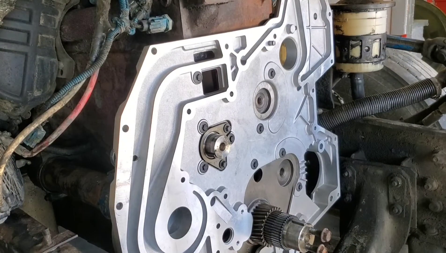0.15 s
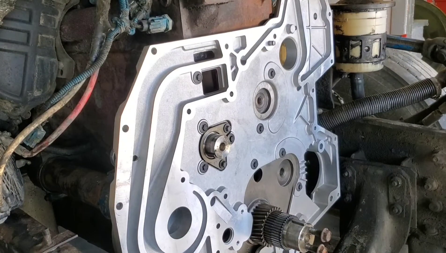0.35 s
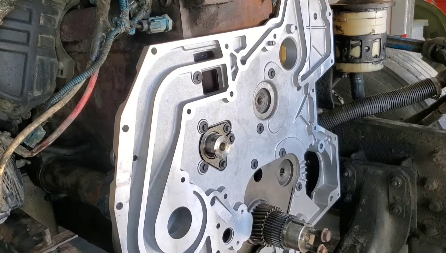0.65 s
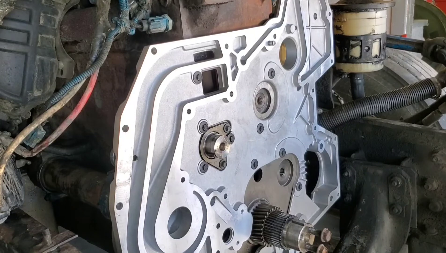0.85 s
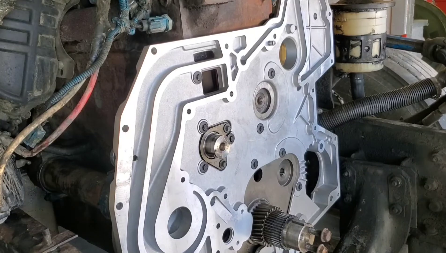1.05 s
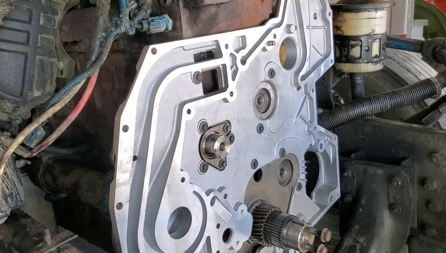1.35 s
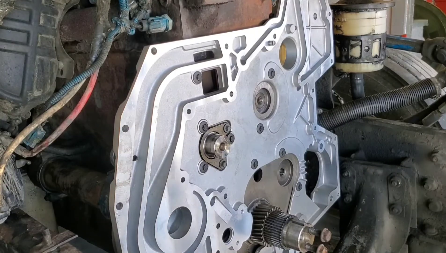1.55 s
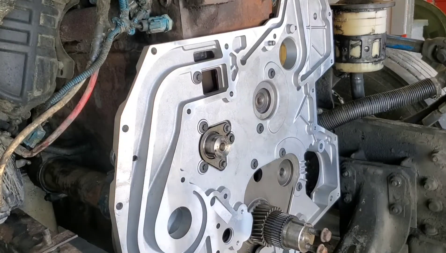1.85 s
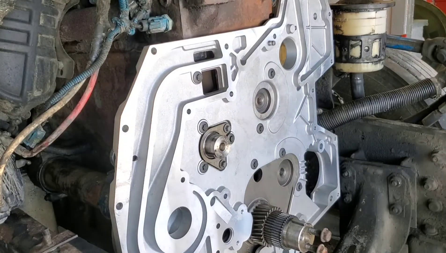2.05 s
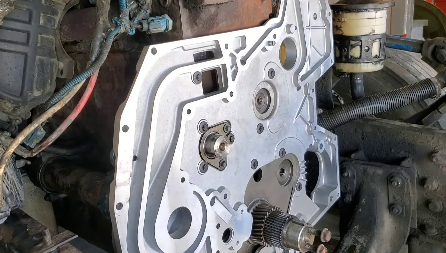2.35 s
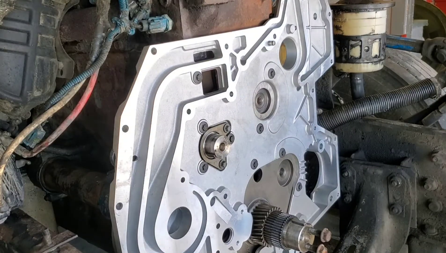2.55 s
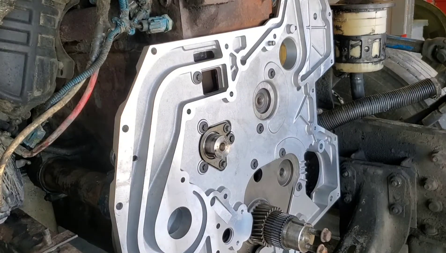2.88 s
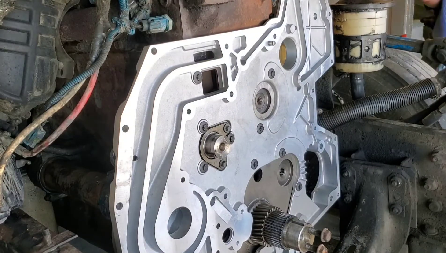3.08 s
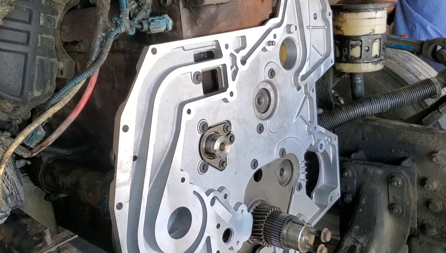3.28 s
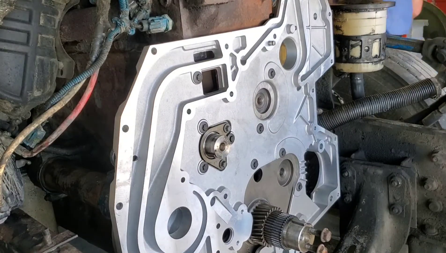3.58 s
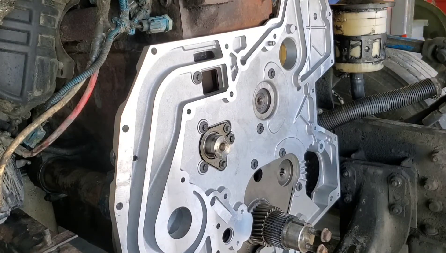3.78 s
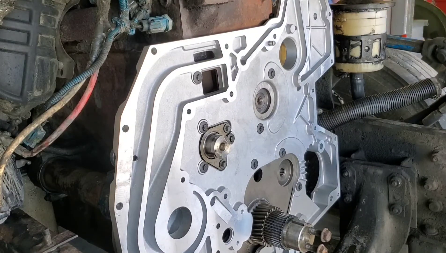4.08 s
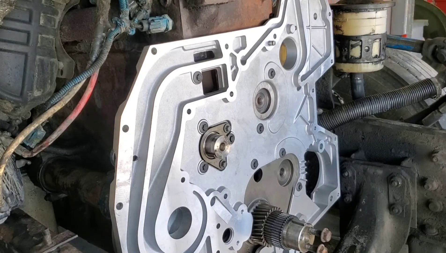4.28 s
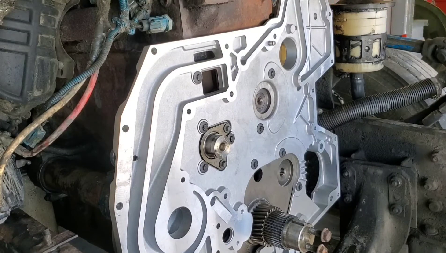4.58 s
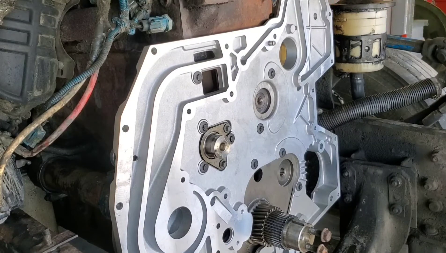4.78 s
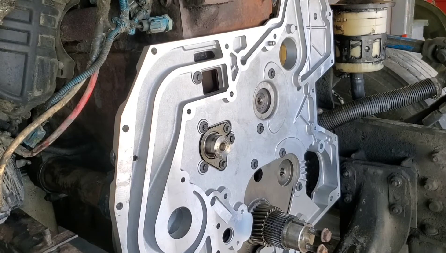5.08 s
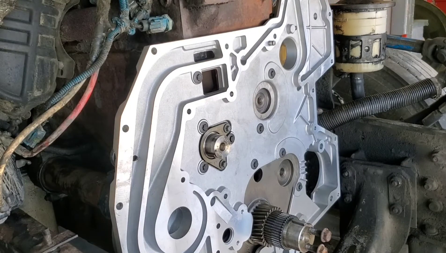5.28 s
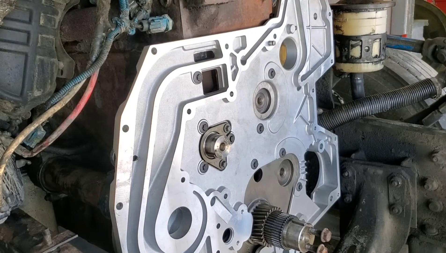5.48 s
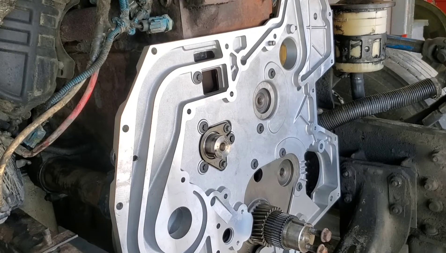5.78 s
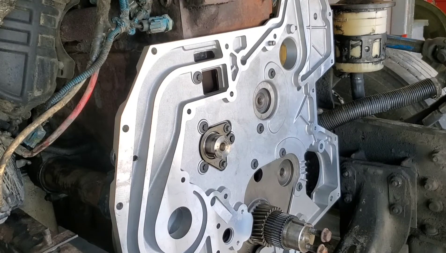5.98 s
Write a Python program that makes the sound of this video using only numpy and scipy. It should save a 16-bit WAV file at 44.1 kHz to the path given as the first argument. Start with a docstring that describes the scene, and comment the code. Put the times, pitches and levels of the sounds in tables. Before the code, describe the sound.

Deep constant machine drone, soft rustling and tiny clicks, faint bird whistles outside, and finally two loud metallic bangs with rattling.

```python
"""A workshop: an engine-driven machine hums steadily beside a smaller motor, with a thin whine and a bird outside.
Someone moves about, cloth rustling and small parts ticking, then a metal box is banged down twice and settles.
Hums, whine and bird are sines; air, cloth, ticks and most of the box are shaped noise; the big panels are wavering
sines. Two microphone ports a hand apart hear it, with the tail of the hall on the ticks, bird and box."""
import sys
import numpy as np
from scipy import signal
from scipy.fft import rfft, irfft, next_fast_len
from scipy.io import wavfile
from scipy.ndimage import uniform_filter1d

SR = 44100
rng = np.random.default_rng(int(sys.argv[2]) if len(sys.argv) > 2 else 0)


def waveform_to_disk(signal):
    """Save audio, clipped to [-1, 1], as 16-bit WAV at the path in sys.argv[1]."""
    frames = np.transpose(np.atleast_2d(signal))
    scaled = np.clip(frames, -1, 1) * 32767
    samples = np.round(scaled).astype(np.int16)
    wavfile.write(sys.argv[1], SR, samples)


N = 270523
T = np.arange(N) / SR  # s
SIZE = next_fast_len(N + SR)  # leaves room for a one-second tail
HZ = np.maximum(np.arange(SIZE // 2 + 1) * SR / SIZE, 1)


def undb(db):
    """Amplitude gain of a level in dB."""
    return 10 ** (np.asarray(db) / 20)


def level(x, db):
    """Scales a sound to an RMS level in dB."""
    return x * undb(db) / np.sqrt(np.mean(x ** 2))


def filt(x, response):
    """Applies a frequency response given on HZ."""
    return irfft(rfft(x, SIZE) * response, SIZE)[..., :N]


def colour(points):
    """Gain on HZ through (f/Hz, level/dB) points, straight over log frequency."""
    hz, db = np.transpose(points)
    return undb(np.interp(np.log(HZ), np.log(hz), db))


def band(hz, width):
    """A causal resonance, gain 1 at the centre."""
    return 1 / (1 + 1j * (HZ / hz - hz / HZ) * hz / width)


def modes(table):
    """Resonances with alternating sign, width from the ring time."""
    total = 0
    for k, (hz, db, t60) in enumerate(table):
        width = np.log(1000) / np.pi / t60
        total = total + (-1) ** k * undb(db) * band(hz, width)
    return total


def diffuse(gain):
    """Coloured noise from all sides at two ports: alike in the bass, unrelated once a wave fits between them."""
    ports_m, sound_m_per_s = 0.16, 343
    re, im = rng.standard_normal((2, 2, len(HZ)))
    alike = np.sinc(2 * HZ * ports_m / sound_m_per_s)
    mid, side = (re + 1j * im) * np.sqrt([1 + alike, 1 - alike]) * gain
    return irfft([mid + side, mid - side], SIZE)[:, :N]


def walk(rate):
    """Random levels held 1 / rate s and slewed twice; spread near 1."""
    k = int(SR / rate)
    steps = np.repeat(rng.standard_normal(N // k + 1), k)
    return 1.98 * uniform_filter1d(uniform_filter1d(steps, k), k)[:N]


def engine():
    """Firing pulses dip the pressure, so all multiples start in step; each wavers a little in the hall."""
    # engine cycle: (t/s, cycle rate f/Hz)
    cycle_rate = [(0, 12.29), (1.6, 12.277), (3.6, 12.277), (4.2, 12.258)]
    # engine hum: {multiple of the cycle rate: peak level/dB}
    harmonics = {4: -37.5, 7: -54, 8: -36.5, 9: -58, 11: -66.5, 12: -50.5, 13: -61, 15: -67, 16: -78, 17:
                 -60, 19: -56, 20: -68, 21: -53.5, 23: -73.5, 25: -61.5, 26: -67.5}
    cycle = 2 * np.pi * np.cumsum(np.interp(T, *np.transpose(cycle_rate))) / SR
    hum = np.zeros(N)
    for k, db in harmonics.items():
        hum -= undb(db + 0.5 * walk(5.02)) * np.cos(k * cycle)
    return hum


def motor():
    """A smaller motor turns at a fixed rate: steady sines at multiples of its shaft rate."""
    shaft_hz = 40.03
    # motor hum: {multiple of the shaft rate: peak level/dB}
    harmonics = {1: -55.5, 2: -57.5, 3: -67.5, 6: -70}
    return sum(undb(db) * np.sin(2 * np.pi * k * shaft_hz * T) for k, db in harmonics.items())


def whine():
    """A thin electric tone, nearly steady in level and phase."""
    whine_hz, whine_db = 5785, -79.5
    phase_drift = 0.4 * walk(25)  # rad
    return undb(whine_db + 1.5 * walk(20)) * np.sin(2 * np.pi * whine_hz * T + phase_drift)


def hall():
    """Air and far machinery in octave bands that swell together and flicker alone."""
    hall_db = -44
    # spectrum of the hall noise, before it is set to hall_db: (f/Hz, level per Hz/dB)
    spectrum = [(15, -32), (25, -5), (107, -4.5), (148, -11.5), (246, -15), (495, -24), (782, -24.5),
                (1240, -30), (1570, -28), (1750, -30.5), (3260, -36), (5280, -47.5), (5880, -45),
                (7500, -56.5), (15500, -74)]
    # resonances of machine housings in the hall noise: (f/Hz, width/Hz, lift/dB)
    housings = [(342, 5.7, 4.5), (379.6, 11, 4.5), (422, 6.5, 3), (515, 7.1, 8.5), (780, 7.4, 4),
                (978, 5.7, 11), (1452, 25, 7.5), (1610, 55, 5), (2010, 140, 4.5)]
    lift_db = sum(db * np.abs(band(hz, width)) ** 2 for hz, width, db in housings)
    shape = colour(spectrum) * undb(lift_db)
    swell, noise = walk(0.23), 0
    for hz in 32 * 2. ** np.arange(9.):
        share = np.maximum(1 - np.abs(np.log2(HZ / hz)), 0)
        if hz > 8000:  # the top band keeps everything above it
            share = np.where(HZ > hz, 1, share)
        flicker = 0.75 * walk(6.5)
        noise = noise + undb(0.5 * swell + flicker) * diffuse(np.sqrt(share) * shape)
    return level(noise, hall_db)


def rubs():
    """Gains of the three colours: each rub climbs, holds and dies away; overlapping rubs add as powers."""
    rise_db, fall_db_per_s = 30.5, 152  # climb during the rise; fall afterwards
    # cloth and hands, one row per rub:
    # (full at t/s, rise/s, hold/s, scuff level/dB, dull drag level/dB, fine hiss level/dB)
    strokes = [(0.0, .01, .02, -61, -60, -61.5), (0.2, 0.017, 0.027, -56.5, -63, -64),
               (0.34, 0.092, 0.022, -58, -66, -62), (0.514, 0.18, 0.066, -58.5, -57, -65.5),
               (0.622, .08, .06, -55, -55.5, -67.5), (0.79, 0.16, 0.064, -53.5, -54.5, -66.5),
               (1.03, 0.27, 0.056, -65.5, -66, -71), (1.213, 0.013, .01, -63, -58, -75),
               (1.356, 0.017, 0.037, -55, -60, -62), (1.555, 0.054, 0.015, -46, -53.5, -62.5),
               (1.833, .08, 0.043, -62, -68, -70.5), (2.16, 0.31, .015, -56.5, -56.5, -67.5),
               (2.26, .06, .03, -59, -60.5, -70), (2.677, 0.17, .1, -74, -59.5, -78),
               (3.043, 0.11, 0.044, -59.5, -56.5, -73), (3.37, 0.45, .06, -57.5, -57, -73),
               (3.667, 0.11, 0.022, -64, -59, -85), (3.904, .06, .05, -60.5, -57, -69),
               (3.996, 0.17, .08, -53, -55, -63), (4.165, 0.099, 0.027, -52, -53.5, -54),
               (4.24, .18, 0.12, -38.5, -48, -54.5), (4.575, .06, 0.068, -54, -50.5, -71.5),
               (5.938, 0.17, 0.12, -54.5, -52.5, -66.5), (6.098, 0.073, .04, -49.5, -52, -59.5)]
    power = 0
    for s, rise, hold, *db in strokes:
        climb_db = rise_db * np.maximum(s - T, 0) / max(rise, 0.002)
        fall_db = fall_db_per_s * np.maximum(T - s - hold, 0)
        shape = undb(-2 * (climb_db + fall_db))  # doubled dB: a power
        power = power + undb(2 * np.array(db))[:, None] * shape
    return np.sqrt(power)


def rustle():
    """Fibres slip in grains too dense to count: a hiss with a slight grit, in three colours."""
    # scuff spectrum, relative: (f/Hz, level per Hz/dB)
    scuff_colour = [(650, -43), (1100, -17.5), (1410, -4.5), (1820, -4.5), (2390, -3), (2720, -4),
                    (3970, -5), (7480, -23), (9000, -20), (11700, -58.5), (19800, -120)]
    # fine fibre hiss spectrum, relative: (f/Hz, level per Hz/dB)
    fibre_colour = [(3820, -26), (6500, 3.5), (7360, -4.5), (9840, 0), (11500, -7.5), (15500, -10)]
    # the top of the hiss grows faster than the rest: stronger rubs are brighter
    airy_above_hz, airy_full_db, airy_power = 12200, -60.5, 1.5
    grit = undb(0.36 * walk(150) + 1.25 * walk(30))
    drag = level(grit * diffuse(band(744, 1810) ** 4), 0)
    scuff = level(grit * diffuse(colour(scuff_colour)), 0)
    hiss = level(grit * diffuse(colour(fibre_colour)), 0)
    hiss = hiss * undb([[-1.3], [1.3]])  # the finest hiss is shaded from the left port
    airy = filt(hiss, 1 / (1 + (airy_above_hz / HZ) ** 12))
    scuff_gain, drag_gain, hiss_gain = rubs()
    airy_gain = undb(airy_full_db) * (hiss_gain / undb(airy_full_db)) ** airy_power
    return scuff * scuff_gain + drag * drag_gain + (hiss - airy) * hiss_gain + airy * airy_gain


def ticks():
    """Each tick is a few milliseconds of noise that rings a small part, with a brighter click at the contact."""
    ring_s, click_s, click_above_hz = 0.0032, 0.0011, 5000
    # small parts, before the gains of direct sound and hall:
    # (t/s, ring peak level/dB, ring f/Hz, bright click against ring level/dB)
    contacts = [(0.2037, -48, 2480, -6), (0.235, -50, 3900, -12), (0.51, -44, 3280, -18),
                (0.57, -51, 2180, -20), (0.6375, -45.5, 1610, -20), (0.7195, -42, 2900, -20),
                (0.776, -41, 1900, -25), (1.219, -45, 1800, -15), (1.232, -57, 3000, -6),
                (1.27, -46, 2190, -27), (1.356, -46, 3380, -8), (1.3894, -55, 3450, -15),
                (1.443, -45.5, 2800, -20), (1.512, -46, 2220, -20), (1.547, -39, 2780, -15),
                (1.5556, -45, 3230, -20), (1.5734, -53, 3270, -20), (1.5994, -48, 1800, -20)]
    out, after = np.zeros(N), np.arange(900) / SR
    above = signal.butter(2, click_above_hz, "highpass", fs=SR, output="sos")
    for s, db, hz, click_db in contacts:
        noise = rng.standard_normal(900)
        around = signal.butter(2, [hz / 1.7, hz * 1.4], "bandpass", fs=SR, output="sos")
        ring = signal.sosfilt(around, np.exp(-after / ring_s) * noise)
        click = signal.sosfilt(above, np.exp(-after / click_s) * noise)
        tick = ring / np.abs(ring).max() + undb(click_db) * click / np.abs(click).max()
        out[int(s * SR):][:900] += undb(db) * tick
    return out


def bird():
    """Whistles far off: a quick falling chirp, then a held note that swells and stops; the air makes them flutter."""
    chirp_s, chirp_fall_hz_per_s = 0.0085, 13000  # half length; glide
    held_after_s, held_swell_s, held_end_s = 0.11, 0.03, 0.014
    # bird calls, before the gains of direct sound and hall:
    # (chirp t/s, chirp f/Hz, chirp level/dB, held f/Hz, held level/dB)
    calls = [(1.815, 3230, -65, 3100, -85), (2.253, 4380, -63, 4250, -62), (4.054, 4270, -50, 4090, -52),
             (4.19, 3650, -54, 3600, -85), (5.495, 4430, -60, 4010, -58)]
    out = np.zeros(N)
    for s, chirp_hz, chirp_db, held_hz, held_db in calls:
        t = np.clip(T - s, -0.1, 0.3)
        hz = np.maximum(chirp_hz - chirp_fall_hz_per_s * t, held_hz)
        late = t - held_after_s
        held = np.exp(np.where(late < 0, late / held_swell_s, -late / held_end_s)) * (t > 0)
        chirp = np.exp(-(t / chirp_s) ** 2)
        envelope = undb(chirp_db) * chirp + undb(held_db) * held
        out += envelope * np.sin(2 * np.pi * np.cumsum(hz) / SR)
    return out * undb(1.5 * walk(70))


def box():
    """Each blow cracks, then chatters on: big panels boom while driven, the deepest longest; small modes knock and clang."""
    knock_top_hz, sizzle_above_hz, sizzle_below_hz, sizzle_rise_s = 925, 6200, 15000, 0.022
    crash_db = -7
    # box blows: (t/s, level/dB, rattle/s, boom tilt/dB per octave,
    # knock, clang and sizzle against the blow level/dB)
    blows = [(4.0, -42, 0.27, -6, -5, -40, -40), (4.852, -27.5, 0.18, -1, 5, 0.4, 8),
             (5.101, -37, 0.078, -6, -12, -11, -23), (5.204, -26.5, 0.11, -1., 2.5, -2, 4.5),
             (5.29, -31.5, 0.2, 0.8, 5, -1, -2), (5.499, -35.5, 0.09, 1.5, 6.5, -3.5, 3.5),
             (5.57, -43, .1, 7, 0, -15, -14), (5.828, -41, 0.24, -7.5, 1.5, -33, -31)]
    # big panels, relative: (f/Hz, level/dB)
    boom_modes = [(77, -9), (90, -7.5), (105, -2.5), (150, -5.5), (184, -4), (211, -7.5), (244, -21.5),
                  (300, -17.5), (350, -19), (399, -19.5)]
    # thin walls, relative: (f/Hz, level/dB, ring/s)
    wall_modes = [(545, -28, 0.25), (816, -21, 0.37), (930, -23, 0.36), (1410, -14, 0.23), (1800, -26, .4),
                  (2150, -26, 0.28), (2620, -18, .3), (3030, -24, 0.12), (3165, -27, 0.26),
                  (3780, -27, 0.3)]
    # the many small modes between, before they are set to crash_db: (f/Hz, level per Hz/dB)
    crash_colour = [(130, -34), (220, -5.5), (258, -8.5), (403, -10), (441, -14.5), (482, -14),
                    (821, -15.5), (898, -20), (1430, -9.5), (2190, -16.5), (2910, -16.5), (15500, -46)]

    panels = []
    for hz, db in boom_modes:
        wobble = 0.62 * walk(14)  # rad
        panels.append((hz, undb(db + 2.06 * walk(25)) * np.sin(2 * np.pi * hz * T + wobble)))

    boom, knock, clang, sizzle = np.zeros((4, N))
    for s, db, rattle, tilt_db, knock_db, clang_db, sizzle_db in blows:
        after = np.maximum(T - s, 0)
        for hz, panel in panels:
            lasts = rattle * (170 / hz) ** 0.34
            driven = (1 - np.exp(-after / 0.0024)) * np.exp(-(after / lasts) ** 3)
            boom += panel * undb(db + tilt_db * np.log2(hz / 150)) * driven
        crack = 0.9 * np.exp(-after / 0.017)
        chatter = (1 - np.exp(-after / 0.0011)) * (np.exp(-(after / rattle * 1.68) ** 2.76) + crack)
        knock += undb(db + knock_db) * chatter
        clang += undb(db + clang_db) * chatter
        # the sizzle starts weak and builds up
        sizzle += undb(db + sizzle_db) * chatter * (1 - 0.85 * np.exp(-after / sizzle_rise_s))

    rings = level(filt(rng.standard_normal(N), modes(wall_modes)), -17)
    crash = level(filt(rng.standard_normal(N), colour(crash_colour)), crash_db)
    dull = filt(rings + crash, 1 / (1 + (HZ / knock_top_hz) ** 6))
    bright = filt(crash, 1 / (1 + (sizzle_above_hz / HZ) ** 4))
    airless = filt(bright, 1 / (1 + (HZ / sizzle_below_hz) ** 6))
    middle = rings + crash - dull - bright
    roughness = undb(2.42 * walk(90))
    return boom, roughness * (knock * dull + clang * middle + sizzle * airless)


def hall_tail():
    """Response of the hall: diffuse noise, energy 1 at each port, that dies slowest in the bass."""
    # reverberation time: (f/Hz, T60/s)
    decay = [(100, 0.7), (1000, 0.43), (12000, 0.46)]
    hz, t60 = np.transpose(decay)
    tail = 0
    for k in range(len(hz)):
        share = np.interp(np.log(HZ), np.log(hz), np.arange(len(hz)) == k)
        fade = np.exp(-np.log(1000) * T[:SR] / t60[k])
        tail = tail + diffuse(np.sqrt(share / t60[k]))[:, :SR] * fade
    return rfft(tail / np.sqrt(np.sum(tail ** 2, axis=1, keepdims=True)), SIZE)


def left_late(s):
    """Response of both ports to a sound that reaches the left one s seconds later."""
    return np.exp(-2j * np.pi * HZ * np.array([[s], [0]]))


def scene():
    """Hums, whine, air and cloth reach the ports without the tail; ticks, bird and box come directly and through it."""
    hum = left_late(0.00025)  # side of the machines
    work = left_late(0.0004)  # side of the handling
    tail = hall_tail()
    machines = filt(engine() + motor(), hum)
    steady = machines + whine() + hall()
    small = filt(ticks(), 1.37 * work + 2.24 * tail) + filt(bird(), 1.8 * work + tail)
    boom, clatter = box()
    struck = filt(boom, hum + 0.33 * tail) + filt(clatter, 0.35 * work + tail)
    return steady + rustle() + small + struck


def record(dry):
    """The left port is a little weaker, both hiss faintly; the deepest bass and the top are cut."""
    left_db, mic_hiss_db = -0.9, -86  # left against right; hiss before the cuts
    bass_cut_hz, top_hz = 40, 15740
    ports = dry * undb([[left_db / 2], [-left_db / 2]])
    ports = ports + undb(mic_hiss_db) * rng.standard_normal(dry.shape)
    ports = filt(ports, 1 / np.sqrt(1 + (bass_cut_hz / HZ) ** 12))
    return signal.sosfilt(signal.ellip(12, 0.2, 80, top_hz, fs=SR, output="sos"), ports)


dry = scene()
out = record(dry)
waveform_to_disk(out)
```